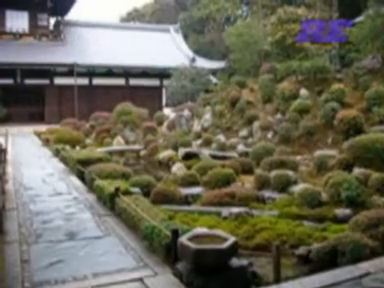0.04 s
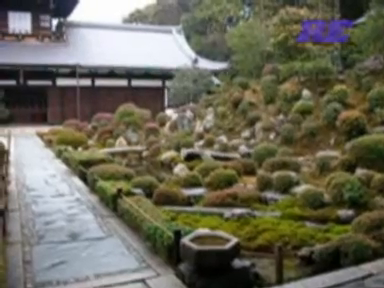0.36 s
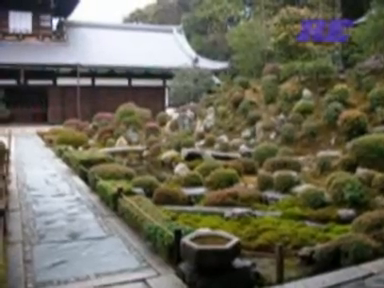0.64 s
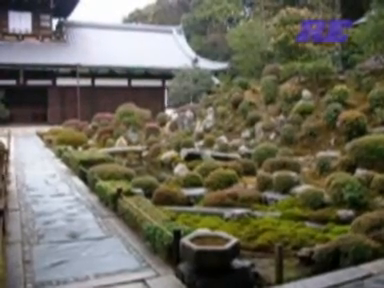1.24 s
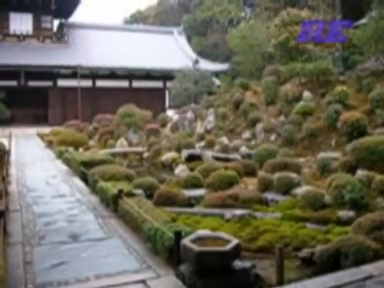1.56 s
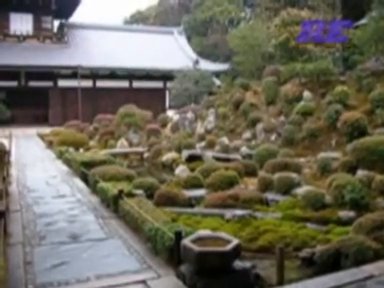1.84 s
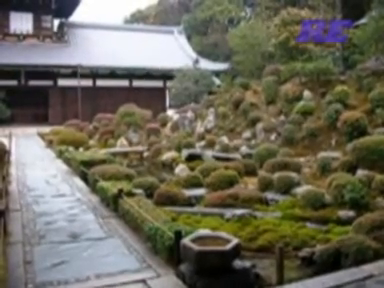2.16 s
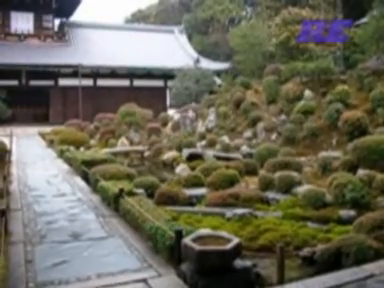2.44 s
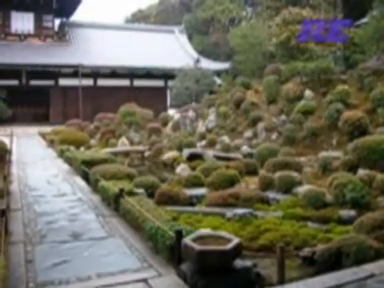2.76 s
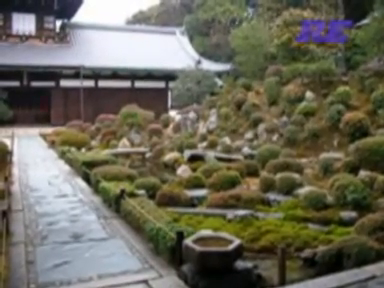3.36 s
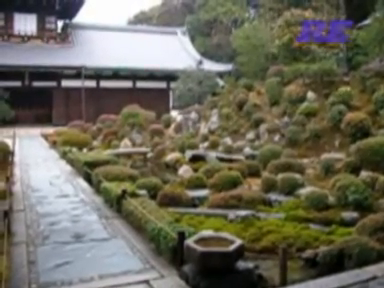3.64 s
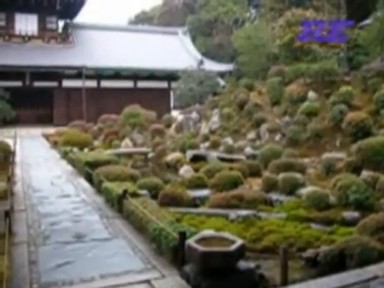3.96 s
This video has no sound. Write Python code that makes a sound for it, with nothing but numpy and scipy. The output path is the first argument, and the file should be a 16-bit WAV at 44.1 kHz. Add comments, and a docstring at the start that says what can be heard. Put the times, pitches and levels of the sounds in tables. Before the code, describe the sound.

A temple bell rings on and is struck again, with distant birds in a quiet garden.

```python
"""A temple bell in a quiet garden, still humming from an earlier blow, is struck again.
The striker knocks; the two lowest main modes ring on, beating slowly with their twins, while the
upper ones die with the clang among the buildings. Birds screech, whistle and call from afar over
soft outdoor noise. One microphone feeds a narrow-band recorder. A thin top hiss drops away after
the second blow and returns near the end."""
import sys
import numpy as np
from scipy import signal
from scipy.fft import rfft, irfft, next_fast_len
from scipy.io import wavfile
from scipy.ndimage import uniform_filter1d

SR = 44100
rng = np.random.default_rng(int(sys.argv[2]) if len(sys.argv) > 2 else 0)


def master_out(mix):
    """Clip the mix to full scale and print it as 16-bit PCM to the path in sys.argv[1]."""
    frames = np.transpose(np.atleast_2d(mix))
    ceiling = np.clip(frames, -1, 1)
    pcm = np.round(ceiling * 32767).astype(np.int16)
    wavfile.write(sys.argv[1], SR, pcm)


N = 176400


def amp(db):
    """Decibels to gain."""
    return np.exp(np.asarray(db) * np.log(10) / 20)


def unit(x):
    """Scale to rms 1."""
    return x / np.sqrt(np.mean(np.abs(x) ** 2) + 1e-20)


def along(points, hz):
    """Read (freq_hz, value) points at hz, on a log frequency axis."""
    freqs, values = np.transpose(points)
    return np.interp(np.log(hz + 1), np.log(freqs + 1), values)


def since(start_s):
    """Seconds since start_s, zero before."""
    return np.maximum(np.arange(N) / SR - start_s, 0)


def wobble(rate_hz):
    """A smooth random curve with rate_hz knots a second."""
    fine = signal.resample_poly(rng.standard_normal(int(N * rate_hz / SR) + 4), 10, 1)
    return np.interp(np.arange(N) * 10 * rate_hz / SR, np.arange(len(fine)), fine)


def filtered(x, response):
    """Filter x by a gain given as a function of frequency."""
    size = next_fast_len(N + SR // 2)
    return irfft(rfft(x, size) * response(np.fft.rfftfreq(size, 1 / SR)), size)[:N]


def noise(spectrum):
    """Coloured noise of rms 1."""
    return unit(filtered(rng.standard_normal(N), lambda hz: amp(along(spectrum, hz))))


def patchy_band(spectrum, levels, patchy_db=1.4):
    """Slightly patchy noise that follows (time_s, level_db) points."""
    bins = signal.stft(noise(spectrum), nperseg=512)[2]
    patches = uniform_filter1d(rng.standard_normal(bins.shape), 6, axis=0)  # smooth in frequency
    patches = unit(uniform_filter1d(patches, 12, axis=1))  # and in time
    band = unit(signal.istft(bins * amp(patchy_db * patches), nperseg=512)[1][:N])
    return band * amp(np.interp(since(0), *np.transpose(levels)))


def dying(x, t60s):
    """Each frequency of x dies at its own speed."""
    hz, t, bins = signal.stft(x, SR, nperseg=256)
    decay = amp(-60 * t / along(t60s, hz)[:, None])
    return signal.istft(bins * decay, SR, nperseg=256)[1][:len(x)]


def note(hz, start, length, edge_s):
    """A sine of rms 1 on a pitch track, with soft edges."""
    t = since(start)
    gate = np.clip(np.minimum(t, length - t) / edge_s, 0, 1)
    return np.sqrt(2) * gate * np.sin(2 * np.pi * np.cumsum(hz) / SR)


# blows on the bell: start_s, level_db, brightness_db_per_octave, twin_boost_db
BLOWS = [(-1.44, -3.4, 2.2, 7), (1.803, 0, 0, 0)]
# the bell's modes: pitch_hz, level_db, t60_s, twin_offset_hz, twin_db, direct_share, swell_s,
# scatter_share, dip_db
BELL_MODES = [(517.4, -23.7, 16, 2.01, -20, .38, .07, .1, 0),
              (962.4, -15.7, 5.2, -2.27, -9.2, .58, .115, .13, -5.5),
              (1433, -8.6, .58, -5.7, -3.5, 0, .15, .08, -5), (1428, -36, 2.2, 8.5, -5, 0, .15, .4, 0),
              (1611, -34, 1.55, 3, -16, .6, .02, .22, 0), (1686, -35.5, 1.15, 4, -10, 1, .01, .35, 0),
              (694, -39, 1.1, 37, -2, .5, .02, .4, 0), (1136, -37.5, 1.1, -63, -1, .5, .02, .35, 0),
              (1841, -43, 1.2, 44, -2, .5, .02, .45, 0), (1779, -43, 1.0, 175, -5, .7, .02, .45, 0),
              (2121, -46, 1.0, 59, -6, .2, .05, .6, 0), (262, -41, .6, 22, -4, 1, .006, .6, 0)]

def bell():
    """Each struck mode swells, beats with its twin and dies away; early garden echoes ruffle it."""
    attack_s, contact_s, twin_build_share = .017, .03, .06
    scatter_hz, scatter_t60_s = 45, 1.3
    dip_at_s, dip_width_s = 1.891, .015  # some modes dip briefly just after the second blow
    dip = np.exp(-((since(0) - dip_at_s) / dip_width_s) ** 2)
    out = np.zeros(N)
    for start, blow_db, brightness, twin_boost_db in BLOWS:
        t = since(start)
        out *= np.exp(-t / contact_s)  # the blow stops the old ring
        for hz, db, t60, offset_hz, twin_db, direct, swell_s, scatter, dip_db in BELL_MODES:
            twin = amp(twin_db + twin_boost_db) * (1 - np.exp(-t / (twin_build_share * t60)))
            pair = (1 + twin * np.exp(2j * np.pi * offset_hz * t)) * amp(-60 * t / t60)
            ruffle = wobble(scatter_hz) + 1j * wobble(scatter_hz)
            echoes = scatter * ruffle * amp(-60 * t / scatter_t60_s)
            rise = (1 - np.exp(-t / attack_s)) * (1 - (1 - direct) * np.exp(-t / swell_s))
            octaves = np.log2(hz / BELL_MODES[0][0])
            level = amp(db + blow_db + brightness * octaves + dip_db * dip) * rise
            out += np.sqrt(2) * level * np.imag((pair + echoes) * np.exp(2j * np.pi * hz * t))
    return out


# decay of the garden's echoes: freq_hz, t60_s
GARDEN_DECAY = [(200, .9), (1500, .9), (4000, .85)]

def garden(x, wet_db):
    """A distant sound reaches the microphone with its echoes from walls and trees."""
    tail = dying(rng.standard_normal(SR), GARDEN_DECAY)
    wet = signal.fftconvolve(x, tail / np.linalg.norm(tail))[:N]
    return (x + amp(wet_db) * wet) / np.hypot(1, amp(wet_db))


# harsh bird calls from afar: start_s, length_s, level_db, start_hz, top_hz, roughness_share
SCREECH_CALLS = [(-.1, .14, -44.5, 2500, 3720, .7), (.126, .085, -40.3, 2500, 3660, .28),
                 (.21, .085, -44, 3400, 3780, .7), (.314, .078, -38, 2300, 3700, .18),
                 (.403, .07, -39, 3000, 3660, .5), (.47, .07, -43.5, 3500, 3800, .8),
                 (.652, .08, -39.8, 2450, 3700, .32), (.735, .05, -37.8, 2600, 3800, 1),
                 (.785, .055, -42.5, 3500, 3800, .7), (1.24, .06, -50.5, 2950, 3330, .2),
                 (1.285, .08, -50, 3300, 3560, .4)]

def screeches():
    """Each call sweeps up and rasps at the top; the other side of the syrinx adds a lower voice."""
    rise_s, rasp_depth_hz, lower_ratio = .016, 420, .85
    out = np.zeros(N)
    for start, length, db, start_hz, top_hz, roughness in SCREECH_CALLS:
        rise = 1 - np.exp(-since(start) / rise_s)
        rasp_hz = roughness * rasp_depth_hz * wobble(rate_hz=1100)
        hz = start_hz + rise * (top_hz - start_hz + rasp_hz)
        upper = note(hz, start, length, edge_s=.014)
        lower = amp(-12) * note(lower_ratio * hz, start, length, edge_s=.014)
        out += amp(db) * rise * (upper + lower)
    return garden(out, wet_db=-1)


# bands of outdoor noise around the microphone: freq_hz, density_db
RUMBLE_SPECTRUM = [(25, -18), (60, -13.5), (140, -7.2), (210, -1.5), (330, -.3), (480, -5), (700, -20),
                   (1500, -50)]
MIDDLE_SPECTRUM = [(200, -30), (450, -4), (620, 0), (900, -2.5), (1400, -6), (2000, -11), (3000, -25)]
HISS_SPECTRUM = [(800, -25), (1800, -3.5), (2700, 1.5), (3400, -3), (4000, -11)]
# their rise and fall: time_s, level_db
RUMBLE_LEVELS = [(0, -47.5), (1.3, -47.3), (1.47, -49), (1.7, -45.5), (2.1, -47.5), (2.4, -45), (2.57, -43),
                 (2.73, -46.5), (2.9, -43.5), (3.15, -48), (3.48, -48.3), (3.7, -44.8), (3.95, -43.5)]
MIDDLE_LEVELS = [(0, -46), (1.7, -45.3), (2.6, -46), (3.1, -49), (3.5, -47.5), (3.8, -44.3), (4, -45)]
HISS_LEVELS = [(0, -48), (.6, -48.5), (.82, -46.5), (1.02, -50.5), (1.3, -50), (1.55, -52), (1.8, -50.5),
               (2.3, -50.7), (3.78, -52.3), (3.95, -49.5)]

def outdoors():
    """Soft, distant noise in bass, middle and treble."""
    return (patchy_band(RUMBLE_SPECTRUM, RUMBLE_LEVELS) + patchy_band(MIDDLE_SPECTRUM, MIDDLE_LEVELS)
            + patchy_band(HISS_SPECTRUM, HISS_LEVELS))


# thin top hiss: freq_hz, density_db
THIN_HISS_SPECTRUM = [(2300, -20), (3300, -2), (3900, 0), (4100, -60)]
# its fall and return: time_s, level_db
THIN_HISS_LEVELS = [(0, -58), (.9, -57), (1.0, -66), (1.07, -57.5), (1.25, -61), (1.58, -67), (1.78, -56),
                    (2.0, -62), (2.25, -75), (3.8, -80), (3.88, -59), (4, -57.5)]

def thin_hiss():
    """A thin top hiss drops away after the second blow and returns near the end."""
    return patchy_band(THIN_HISS_SPECTRUM, THIN_HISS_LEVELS)


# low drone: freq_hz, density_db
DRONE_SPECTRUM = [(110, -40), (165, -7), (210, 0), (245, -8), (300, -30)]
# its swells: time_s, level_db
DRONE_LEVELS = [(0, -66), (2.0, -58), (2.55, -48), (3.2, -57), (3.55, -57), (3.8, -49.5)]

def drone():
    """A low, fuzzy drone grows after the second blow."""
    return patchy_band(DRONE_SPECTRUM, DRONE_LEVELS)


# hollow bird calls far from the microphone: start_s, length_s, level_db, pitch_hz, octave_db
CAW_CALLS = [(.61, .13, -46.5, 620, -16), (1.25, .24, -42.3, 617, -8), (1.56, .09, -47.5, 622, 3),
             (2.25, .15, -45.5, 602, -16), (2.38, .2, -43, 605, -4), (3.55, .22, -46, 455, -16),
             (3.66, .22, -47.5, 612, -8)]

def caws():
    """A far bird sounds a fundamental and its octave, arching and wavering slightly in pitch."""
    arch_share, waver_share = .02, .012
    out = np.zeros(N)
    for start, length, db, pitch_hz, octave_db in CAW_CALLS:
        arch = np.sin(np.pi * np.minimum(since(start) / length, 1))
        hz = pitch_hz * (1 + arch_share * (arch - 1) + waver_share * wobble(rate_hz=90))
        octave = amp(octave_db) * note(2 * hz, start, length, edge_s=.035)
        out += amp(db) * (note(hz, start, length, edge_s=.035) + octave)
    return garden(out, wet_db=-4)


# thin bird whistles in the distance: start_s, length_s, level_db, start_hz, end_hz
WHISTLE_CALLS = [(1.08, .28, -57, 2220, 2020), (2.85, .11, -55, 1960, 2130), (2.98, .23, -53.5, 2130, 2280)]

def whistles():
    """A far bird glides on one pure, slightly unsteady tone."""
    out = np.zeros(N)
    for start, length, db, start_hz, end_hz in WHISTLE_CALLS:
        glide_hz = start_hz + (end_hz - start_hz) * np.minimum(since(start) / length, 1)
        waver_hz = 25 * wobble(rate_hz=70)
        out += amp(db) * note(glide_hz + waver_hz, start, length, edge_s=.03)
    return garden(out, wet_db=-4)


# the striker's knock: freq_hz, density_db
THUD_SPECTRUM = [(100, -22), (230, 0), (650, 0), (1400, -4), (2200, -22), (4000, -45)]

def thud():
    """The short, dull knock of the striker meeting the bell."""
    level_db, attack_s, t60_s = -29, .003, .13
    t = since(BLOWS[-1][0])
    return noise(THUD_SPECTRUM) * amp(level_db - 60 * t / t60_s) * (1 - np.exp(-t / attack_s))


# the clang: freq_hz, density_db
CLANG_SPECTRUM = [(120, -25), (250, 1), (400, -5), (700, -3), (1050, -1), (1700, -2), (2150, -4.5),
                  (2600, -18), (4000, -29)]
# its decay among the buildings: freq_hz, t60_s
CLANG_DECAY = [(250, .7), (900, 1.0), (1800, 1.25), (3500, 1.4)]

def clang():
    """The dense, short ring of the last blow, thrown back once to the microphone by a wall."""
    level_db, attack_s, echo_s, echo_db = -29.8, .012, .08, -4
    attack = 1 - np.exp(-since(0) / attack_s)
    out = np.zeros(2 * N)
    for delay_s, path_db in ((0, 0), (echo_s, echo_db)):
        burst = dying(noise(CLANG_SPECTRUM), CLANG_DECAY) * attack
        onset = round((BLOWS[-1][0] + delay_s) * SR)
        out[onset:onset + N] += amp(level_db + path_db) * burst
    return out[:N]


def scene():
    """Bell, birds and noise in one channel."""
    return (bell() + screeches() + outdoors() + thin_hiss() + drone()
            + caws() + whistles() + thud() + clang())[None]


# the recorder's treble filter: freq_hz, gain_db
RECORDER_ROLL_OFF = [(3500, 0), (4000, -1), (4280, -5), (4600, -18), (4800, -20), (5050, -28), (5300, -46)]

def record(dry):
    """The recorder's low sample rate mirrors the treble; its filter rolls the mirror image off."""
    sample_rate_hz, top_hz, converter_offset = 7875, 5300, -.0257
    narrow = filtered(dry[0], lambda hz: hz < sample_rate_hz / 2)
    mirrored = narrow * (1 + 2 * np.cos(2 * np.pi * sample_rate_hz * since(0)))
    rolled_off = filtered(mirrored, lambda hz: amp(along(RECORDER_ROLL_OFF, hz)) * (hz < top_hz))
    return rolled_off[None] + converter_offset


dry = scene()
out = record(dry)
master_out(out)
```